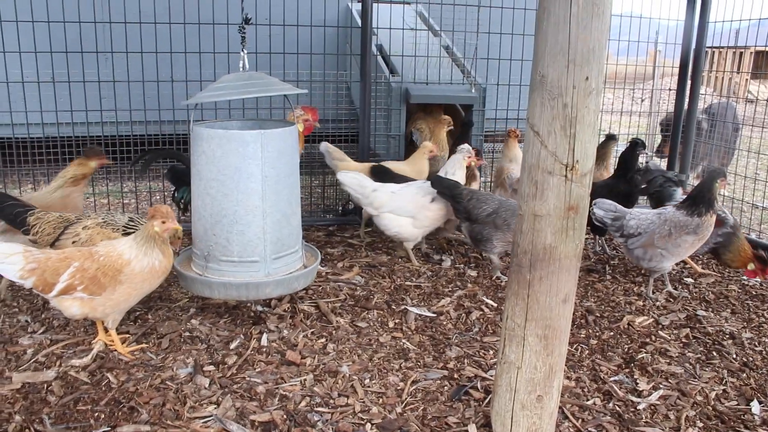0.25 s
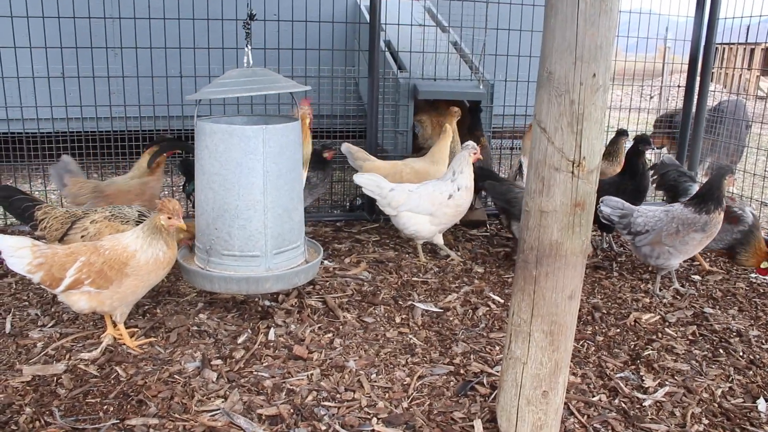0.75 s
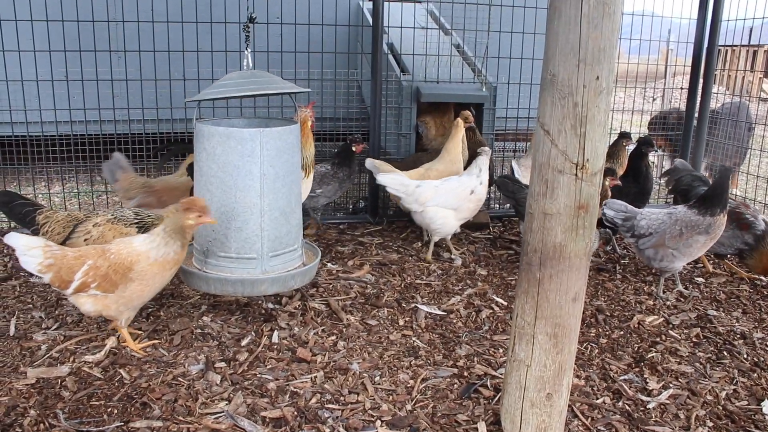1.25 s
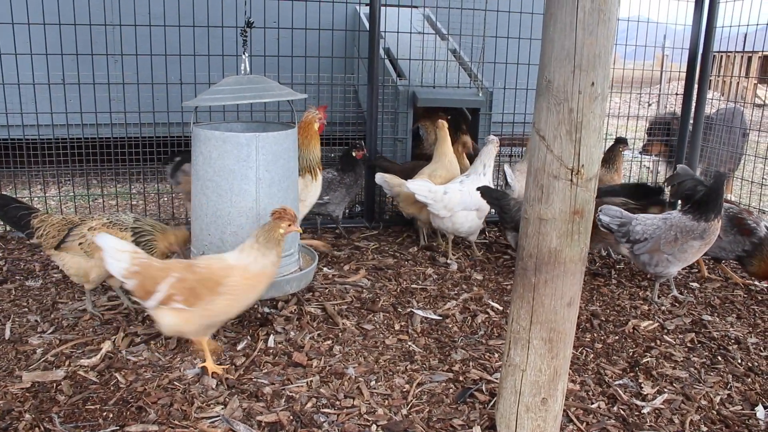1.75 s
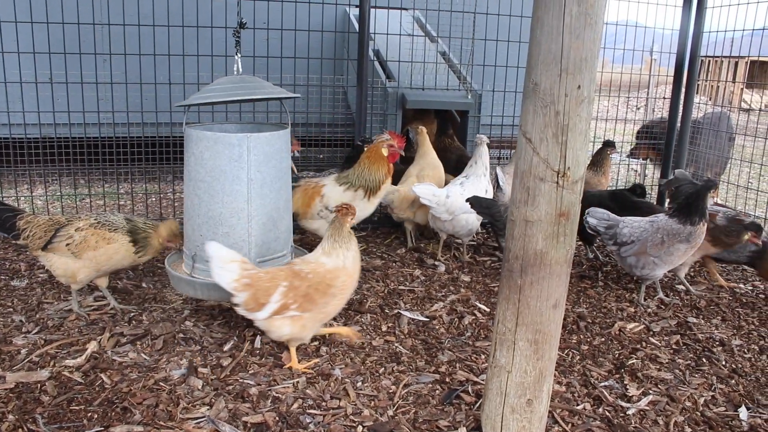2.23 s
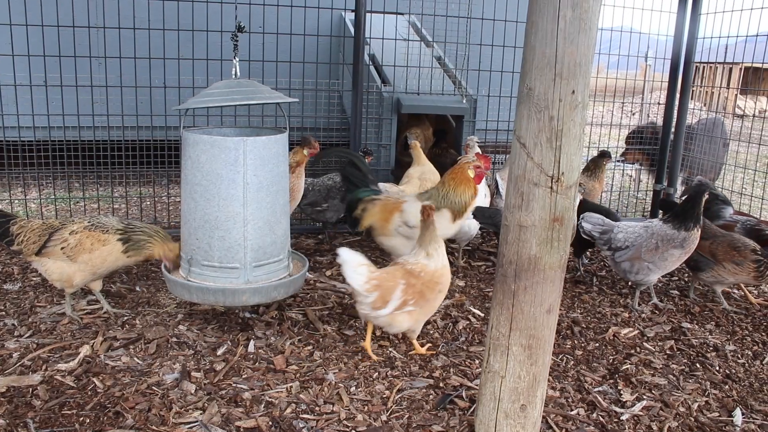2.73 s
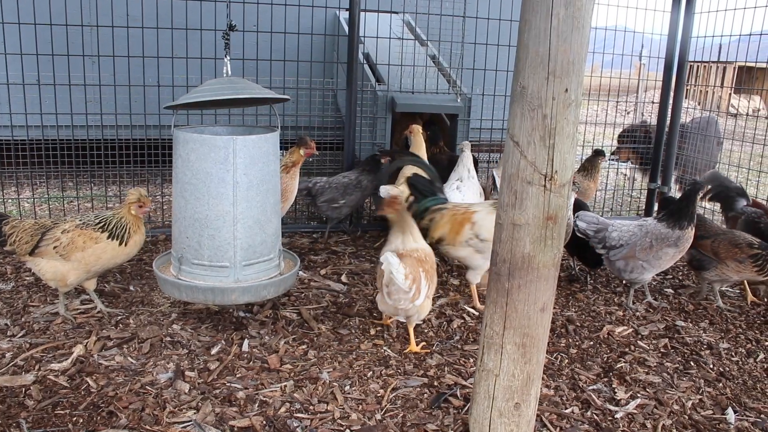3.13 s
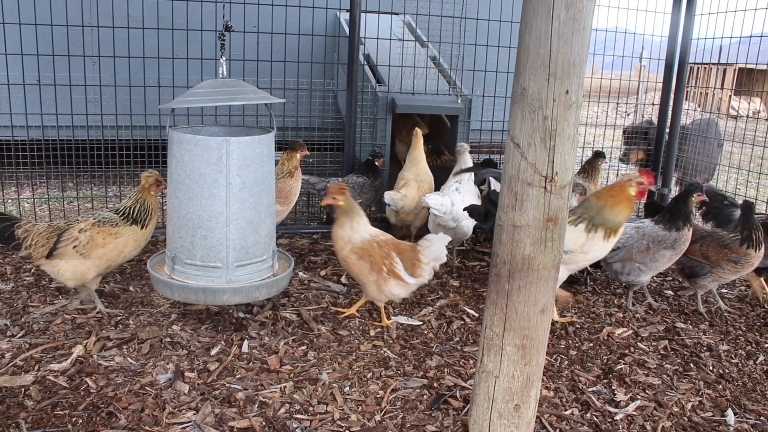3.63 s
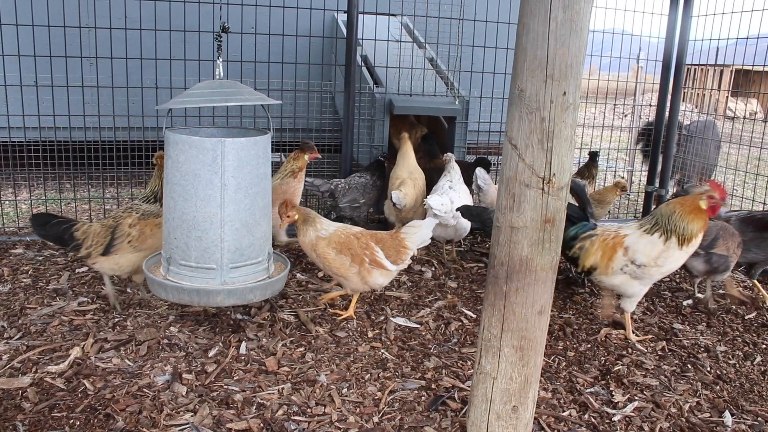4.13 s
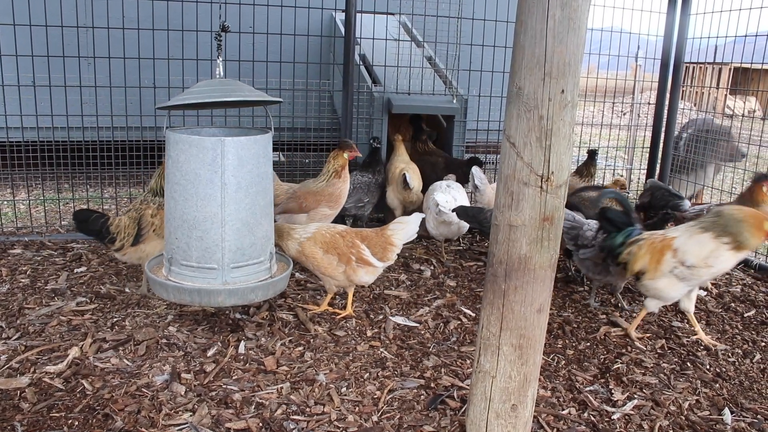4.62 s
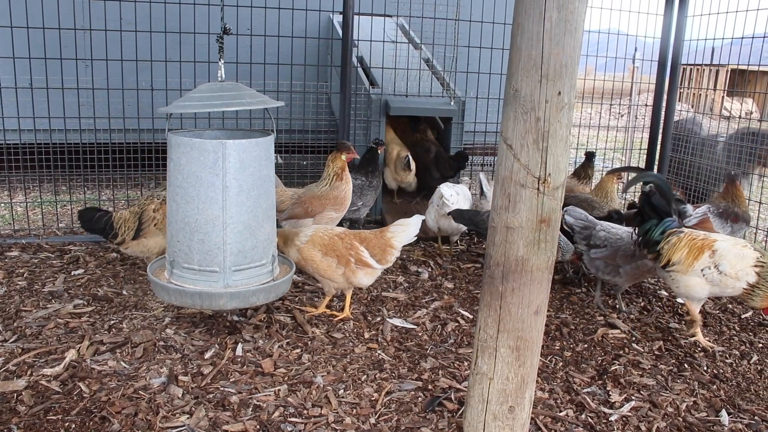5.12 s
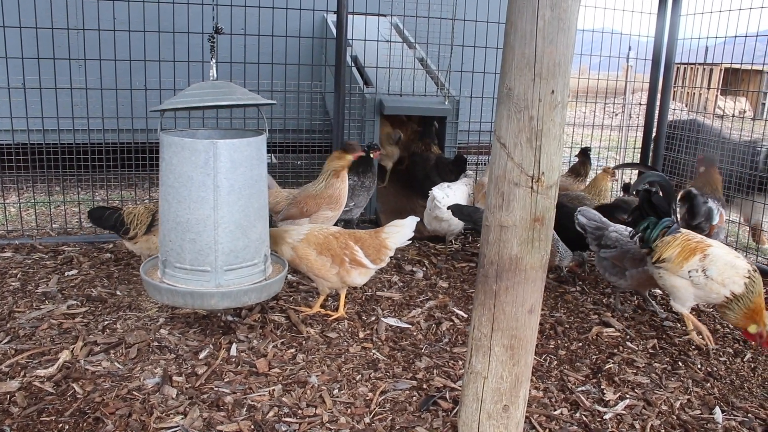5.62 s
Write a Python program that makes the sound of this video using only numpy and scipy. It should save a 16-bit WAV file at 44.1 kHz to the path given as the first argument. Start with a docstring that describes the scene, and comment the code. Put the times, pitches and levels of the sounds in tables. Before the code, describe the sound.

Loud, lumpy wind buffets the microphone as chickens cluck, chirp and whine, with small scuffs and snaps of wood chips underfoot.

```python
"""Wind rumbles and thumps on a microphone in an outdoor run while hens cluck, whine and chirp.
Calls are harmonic tones with half-pitch partials, thrown back by the coop wall and ground.
Feet, wings and beaks stir wood chips: band-passed grainy strokes and short snaps.
The wind is shaped noise with single thumps, over a patchy outdoor wash and recorder hiss."""
import sys
import numpy as np
from scipy import signal
from scipy.io import wavfile
from scipy.ndimage import uniform_filter1d, minimum_filter1d

SR = 44100
rng = np.random.default_rng(int(sys.argv[2]) if len(sys.argv) > 2 else 0)


def master_out(mix):
    """Clip the mix to full scale and print it as 16-bit PCM to the path in sys.argv[1]."""
    frames = np.transpose(np.atleast_2d(mix))
    ceiling = np.clip(frames, -1, 1)
    pcm = np.round(ceiling * 32767).astype(np.int16)
    wavfile.write(sys.argv[1], SR, pcm)


N = 258867


def gain_of(db):
    """Decibels to amplitude."""
    return 10 ** (np.asarray(db) / 20)


def evened(x):
    """Scales to rms 1."""
    return x / np.sqrt(np.mean(x ** 2) + 1e-20)


def read(points, hz):
    """Reads a spectrum on a log-frequency axis."""
    f, value = np.transpose(points)
    return np.interp(np.log(hz + 1), np.log(f + 1), value)


def add(mix, s, sound):
    """Mixes a sound in at time s."""
    part = mix[round(s * SR):][:len(sound)]
    part += sound[:len(part)]


def smooth_twice(x, size):
    """Two moving averages in a row: a gentle low-pass."""
    return uniform_filter1d(uniform_filter1d(x, size), size)


def wander(size, per_s):
    """Smooth random curve of about rms 1 that changes about per_s times a second."""
    span = max(int(SR / per_s), 1)
    return smooth_twice(rng.standard_normal(size), span) * np.sqrt(1.5 * span)


def grid(size):
    """Bin frequencies and frame times of the short-time spectra."""
    hop = size / 4
    return np.fft.rfftfreq(size, 1 / SR), np.arange(4 * N // size + 5) * hop / SR


def noise(db, size):
    """Noise whose short-time spectra follow db, an array of bins x frames."""
    real, imag = rng.standard_normal(db.shape[::-1] + (2,)).T
    spectra = (real + 1j * imag) * gain_of(db)
    return signal.istft(spectra, nperseg=size, noverlap=size * 3 // 4)[1][:N]


def band(x, lo_hz, hi_hz):
    """Steep band-pass."""
    sos = signal.butter(3, [lo_hz, min(hi_hz, SR / 2.5)], "band", fs=SR, output="sos")
    return signal.sosfilt(sos, x)


def hens():
    """All calls, high-passed by the small throat, with echoes off the coop wall and ground."""
    # clucks: start_s, length_s, peak_at_share, pitch_at_peak_hz, pitch_sag_share, level_at_peak_db,
    # half_pitch_partials_db, overtones_db (both against the pitch)
    cluck_rows = [(0.245, 0.043, 0.42, 1105, 0.17, -29, -29, -25),
                  (0.346, 0.037, .35, 1111, 0.011, -35.5, -20, -28),
                  (.458, 0.032, 0.36, 990, 0.03, -31, -26, -17),
                  (0.616, 0.047, 0.32, 1123, 0.018, -38, -15, -22),
                  (0.676, 0.035, 0.41, 900, .04, -35, -12, -26),
                  (0.854, 0.044, 0.31, 1029, 0.18, -27.5, -21, -32),
                  (1.013, 0.055, 0.58, 612, 0.16, -28.5, 6, -12),
                  (1.287, 0.041, .45, 1041, 0.012, -29.5, -19, -18),
                  (1.793, 0.049, 0.29, 1031, 0.14, -27, -1.5, -26),
                  (1.983, 0.02, .45, 666, 0.0019, -38.5, -1, -17),
                  (2.225, 0.054, .4, 919, 0.061, -38, -6, -21),
                  (2.329, 0.035, 0.66, 643, 0.17, -35.5, -2, -20),
                  (2.568, 0.032, 0.58, 1083, -0.021, -30.5, 0.5, -16),
                  (2.843, 0.039, 0.17, 921, -0.026, -26, -6.5, -17),
                  (3.676, .052, .35, 973, 0.096, -24, -6, -35),
                  (3.879, 0.042, .35, 1046, -0.07, -32.5, 3.5, -21),
                  (4.271, 0.04, 0.44, 960, 0.064, -20, -13.5, -27),
                  (4.474, 0.043, 0.2, 972, -0.05, -16.5, -16, -24.5),
                  (4.53, 0.013, 0.47, 720, 0.027, -29, 7, -18), (5.503, 0.018, .4, 716, .01, -39, 10, -10),
                  (5.567, 0.014, 0.39, 676, .06, -36.5, 4, -12)]
    # long whines, one list a call: time_s, pitch_hz, level_db
    whine_calls = [
        [(2.44, 882, -47), (2.456, 887, -28.5), (2.474, 892, -32.5), (2.496, 818, -33.5), (2.582, 837, -30),
         (2.61, 792, -31.5), (2.625, 768.9, -44)],
        [(2.563, 1100, -47), (2.569, 1096, -32), (2.585, 1051, -31), (2.609, 1051, -32.5), (2.627, 996, -35),
         (2.717, 1059, -28), (2.723, 1003, -33), (2.787, 1020, -33), (2.825, 984, -45.5), (2.855, 944, -35),
         (2.865, 1046, -30), (2.887, 1033, -53), (2.899, 1072, -28), (2.935, 980, -43), (2.951, 1014, -32),
         (2.973, 1016, -42), (2.983, 973, -51), (3.015, 968, -35), (3.035, 979, -51)],
        [(3.776, 966, -31), (3.796, 968, -17.5), (3.82, 956, -35.5), (3.832, 966.2, -24), (3.918, 954, -24),
         (3.93, 1048, -28), (3.948, 1052, -26.5), (4.012, 1093, -40), (4.032, 1164, -40), (4.058, 1098, -30),
         (4.082, 1112, -33), (4.098, 1165, -28.5), (4.122, 1155, -25), (4.15, 1164, -53)],
        [(4.328, 900, -54), (4.338, 892, -41), (4.364, 717, -39), (4.386, 700, -35), (4.4, 693, -54)],
    ]
    # one value a whine: overtones_db against the pitch at whine_full_db
    whine_over_db = [-32, -26.5, -43, -29]
    # falling chirps: start_s, length_s, start_hz, end_hz, level_at_peak_db, peak_at_share, overtones_db
    chirp_rows = [(1.065, 0.048, 1650, 790, -23.5, 0.65, -19), (3.013, 0.029, 960, 730, -39, 0.53, -22),
                  (4.41, 0.062, 1900, 1108, -28.5, 0.69, -13.5), (4.682, .057, 1776, 1060, -30, 0.64, -18)]
    # coop wall and ground: delay_s, level_db
    echoes = [(.006, -15), (.011, -23), (.019, -19.5), (.027, -26.5), (.038, -25.5)]
    whine_full_db, whine_half_db, throat_hz = -29, -29, 400

    voices = np.zeros(N)
    for row in cluck_rows:
        add(voices, *call(cluck(*row), rough=.014, flutter_db=1.4, breath_db=-9))
    for points, over_db in zip(whine_calls, whine_over_db):
        # the overtones hold their own level while the pitch swells and dips
        rows = [(s, hz, db, whine_half_db, over_db + whine_full_db - db) for s, hz, db in points]
        add(voices, *call(rows, rough=.008, flutter_db=2.2, breath_db=-16))
    for row in chirp_rows:
        add(voices, *call(chirp(*row), rough=.014, flutter_db=1.4, breath_db=-12))

    # the small throat hardly radiates below throat_hz
    voices = signal.sosfilt(signal.butter(3, throat_hz, "high", fs=SR, output="sos"), voices)
    out = voices.copy()
    for s, db in echoes:
        blur = 1 + 0.61 * wander(N, 340)  # rough surfaces
        add(out, s, gain_of(db) * voices * blur)
    return out


def cluck(start, length, top, hz, sag, db, half_db, over_db):
    """Quick rise, slow then faster fade; the pitch glides and the half-pitch partials grow."""
    hold_share, half_growth_db = 0.22, 7
    u = np.array([0, top, min(top + hold_share, .9), 1])
    level_db = db + np.array([-14, 0, -3, -18])
    pitch_hz = hz * (1 + sag * (top - u))
    half_db = half_db + half_growth_db * (u - top)
    return np.transpose([start + length * u, pitch_hz, level_db, half_db, over_db + 0 * u])


def chirp(start, length, from_hz, to_hz, db, top, over_db):
    """The pitch drops and settles while the level swells and the overtones dull."""
    steepness, lead_share = 7.14, .22  # the middle of the drop leads the peak
    start_db, end_db, half_db, dulling_db = -39, -13, -17, 16
    u = np.linspace(0, 1, 16)
    fall = 1 / (1 + np.exp(steepness * (u - top + lead_share)))
    pitch_hz = to_hz + (from_hz - to_hz) * fall
    level_db = db + np.interp(u, [0, top, 1], [start_db, 0, end_db])
    over_db = over_db + dulling_db * (top - u)
    return np.transpose([start + length * u, pitch_hz, level_db, half_db + 0 * u, over_db])


def call(rows, rough, flutter_db, breath_db):
    """A syrinx tone: every second beat differs a little, which adds partials at half steps of the pitch."""
    s, *columns = np.transpose(rows)
    t = np.arange(s[0], s[-1], 1 / SR)
    hz, level_db, half_db, over_db = (np.interp(t, s, c) for c in columns)
    turns = np.cumsum(hz * (1 + rough * wander(len(t), 180))) / SR + rng.random()
    tone = np.sin(2 * np.pi * turns)
    for k in range(4):
        tone += gain_of(half_db - 17.1 * abs(k - .4)) * np.sin(2 * np.pi * (k + .5) * turns)
        tone += gain_of(over_db - 9.5 * k) * np.sin(2 * np.pi * (k + 2) * turns)
    tone *= 1 + gain_of(breath_db) * wander(len(t), 650)  # turbulent air smears each partial
    edge = np.clip(np.minimum(t - s[0], s[-1] - t) / 0.0088, 0, 1)  # fades in and out
    level = gain_of(level_db + flutter_db * wander(len(t), 48))
    return s[0], np.sqrt(2) * tone * edge * level


def scuffs():
    """Feet and wings stir the chips: noise chopped into grains, with a quick start and a slower end."""
    # strokes: start_s, length_s, level_db (rms before the envelope), low_edge_hz, high_edge_hz
    strokes = [(0.438, .015, -40, 400, 900), (0.723, 0.013, -29, 585, 1470), (.736, 0.061, -42, 800, 4450),
               (0.743, 0.071, -28, 400, 1140), (.765, .022, -30.5, 376, 1190),
               (.811, 0.023, -33.5, 400, 3750), (0.827, 0.022, -27.5, 400, 1290),
               (1.221, 0.024, -36.5, 700, 1790), (1.953, .06, -54.5, 5000, 14000),
               (2.197, .02, -43, 1500, 3420), (2.332, 0.021, -33, 398, 1290),
               (2.465, 0.024, -55, 7000, 15000), (2.848, 0.016, -37, 500, 3200),
               (3.082, 0.094, -50, 2980, 11900), (3.24, 0.1, -36.5, 700, 5000),
               (3.293, .016, -31, 2000, 5070), (3.307, 0.044, -27.5, 685, 3540),
               (3.329, .023, -32, 596, 7000), (3.36, 0.022, -34, 1980, 15000),
               (3.37, 0.037, -41, 5900, 15000), (3.372, 0.07, -43, 1220, 3900),
               (3.387, 0.015, -26.5, 470, 1140), (3.809, 0.033, -35, 444, 1450),
               (3.885, 0.086, -40, 450, 4470), (3.94, .088, -57, 5000, 13000),
               (4.103, 0.018, -40, 500, 1800), (5.017, .034, -37, 450, 1200)]
    out = np.zeros(N)
    for s, length, db, lo_hz, hi_hz in strokes:
        t = np.arange(0, 3 * length, 1 / SR)
        grains = rng.standard_normal(len(t)) * gain_of(3.5 * wander(len(t), 350))
        dull = signal.lfilter([1], [1, -.8], grains)  # soft chips favour the low end of the band
        shape = np.clip(t / (0.3 * length), 0, 1) * np.exp(-(t / length) ** 0.84)
        add(out, s, gain_of(db) * evened(band(dull, lo_hz, hi_hz)) * shape)
    return out


def ticks():
    """Chips snap under claws and beaks: a click and a short crackle in the band of each chip."""
    # snaps: start_s, peak_db, low_edge_hz, high_edge_hz, t60_s
    snaps = [(1.6096, -41.5, 6500, 11500, .02), (1.73, -41, 5000, 10000, .01),
             (1.9505, -39, 5000, 15000, 0.011), (2.081, -47, 6000, 10000, .01),
             (2.479, -41, 5000, 15000, .008), (2.514, -30.5, 3500, 15500, 0.0095),
             (2.5388, -28.5, 2500, 5600, 0.02), (2.544, -37, 3500, 5800, 0.074),
             (2.6045, -41, 4500, 12000, .01), (2.698, -33, 3000, 13000, 0.018),
             (2.961, -36.5, 2630, 3600, 0.039), (3.154, -34.5, 1502, 4930, 0.031),
             (3.8875, -43, 4000, 9000, .02), (3.913, -39, 2500, 6000, 0.018),
             (3.966, -42, 3500, 11500, .02), (4.001, -30, 2500, 12800, 0.022),
             (4.041, -52, 4450, 11000, .008), (4.203, -52, 2500, 4500, .02),
             (4.2387, -33, 2700, 3650, 0.038), (5.094, -32, 2505, 5400, 0.012),
             (5.4459, -26.5, 3000, 7900, 0.007)]
    out, t = np.zeros(N), np.arange(3000) / SR
    for s, db, lo_hz, hi_hz, t60 in snaps:
        click_and_crackle = (t == 0) + 0.22 * rng.standard_normal(len(t))
        snap = band(click_and_crackle * gain_of(-60 * t / t60), lo_hz, hi_hz)
        add(out, s, gain_of(db) * snap / abs(snap).max())
    return out


def wind():
    """Eddies on the microphone: lumpy low noise that reaches higher in hard gusts, and single thumps."""
    # gust course: time_s, nominal_rumble_db, upper_rumble_db (against the low rumble)
    gust_points = [(0.0, -32.5, -6), (0.08, -27, -24), (0.16, -21, -5), (0.23, -28, -13),
                   (0.41, -27, -12.5), (0.6, -39, -6), (0.75, -16.5, -8.5), (0.95, -27, -8),
                   (1.04, -15.5, -13.5), (1.14, -17.5, -4.5), (1.19, -11.5, -9.5), (1.54, -16, -1.5),
                   (1.68, -18.5, -16.5), (1.73, -23, -1), (1.78, -17.5, -5.5), (1.86, -26.5, -2.5),
                   (1.93, -13, -6), (1.98, -25, -2), (2.03, -19.5, -11.5), (2.45, -38, -7.5),
                   (2.68, -23.5, -21), (2.71, -29, -7), (2.89, -30.5, -16), (3.06, -41.5, -7),
                   (3.27, -12.5, -5), (3.3, -19.5, -6), (3.92, -16, -7), (3.97, -20.5, -11.5),
                   (4.13, -15, -3.5), (4.41, -27.5, -13), (4.58, -32.5, -1), (4.84, -26.5, -9.5),
                   (5.0, -24.5, -4), (5.1, -17, -11), (5.13, -29, -2), (5.18, -7, -0.5), (5.26, -19, -7),
                   (5.36, -12.5, -4.5), (5.49, -23, -4), (5.54, -17.5, -12), (5.75, -21, -2),
                   (5.77, -14.5, -4), (5.85, -23.5, -14), (5.87, -23.5, -1.5)]
    # spectrum in a hard gust: frequency_hz, level_db_per_hz (relative)
    hard_gust_spectrum = [(8, -6), (25, 0.5), (70, -1), (150, -6.5), (220, -15), (300, -25), (430, -34),
                          (700, -39.5), (1500, -70), (4000, -100)]
    # how far each band follows the upper rumble: frequency_hz, share
    brightening = [(60, 0.0091), (160, 1.73), (400, 0.71)]
    # single eddies that thump the port: start_s, level_db
    thumps = [(.726, -20), (1.346, -7.5), (1.356, -8.5), (1.604, -21), (1.741, -17.5), (1.932, -17.5),
              (2.091, -22.5), (3.196, -28), (3.24, -19), (3.253, -19), (3.564, -20), (3.744, -12.5),
              (3.77, -12.5), (3.865, -14.5), (3.916, -13), (4.062, -21), (4.073, -12.5), (4.129, -16.5),
              (4.196, -21), (5.166, -8.5), (5.19, -7), (5.308, -19), (5.375, -15), (5.584, -14.5)]
    hard_gust_upper_db, swell_db, swells_per_s = -5, 1.25, 18

    hz, t = grid(size=2048)
    s, rumble_db, upper_db = np.transpose(gust_points)
    upper_change_db = np.interp(t, s, upper_db) - hard_gust_upper_db
    shape_db = read(hard_gust_spectrum, hz)[:, None] + np.outer(read(brightening, hz), upper_change_db)
    low_power = (gain_of(shape_db[hz < 110]) ** 2).sum(0)
    eddies = evened(noise(shape_db - 10 * np.log10(low_power), size=2048))
    # level partly evened out: the gusts set the slow course
    eddies = eddies / (uniform_filter1d(eddies ** 2, size=3000) + 0.046) ** 0.37

    # small eddies pass the port one by one, and lump the upper rumble most
    low = smooth_twice(eddies, 130)
    lumps = wander(N, 43.7)
    lumpy = low * gain_of(1.65 * lumps) + (eddies - low) * gain_of(5.2 * lumps - 2.0)
    course_db = np.interp(np.arange(N) / SR, s, rumble_db) + 1.5
    out = lumpy * gain_of(course_db + swell_db * wander(N, swells_per_s))

    thump_hz = 230 * gain_of(2.04 * rng.standard_normal(len(thumps)))
    for (s, db), hz in zip(thumps, thump_hz):
        u = np.arange(0, 3, hz / SR)  # time in cycles
        add(out, s, gain_of(db) * np.sin(2 * np.pi * u) * np.exp(-((u - .8) / 0.62) ** 2))
    return out


def wash():
    """Far wind in the yard and the shuffle of the flock: patchy noise that flickers slightly."""
    # spectrum: frequency_hz, level_db_per_hz (relative)
    wash_spectrum = [(60, -30), (140, -10), (250, 2), (600, -2), (1050, 0), (1600, -7.5), (2300, -6),
                     (3500, -12), (5500, -21.5), (9000, -36), (16000, -30.5)]
    level_db = -44.5
    hz, t = grid(size=512)
    patches = rng.standard_normal((len(t), len(hz))).T
    patches = evened(uniform_filter1d(uniform_filter1d(patches, size=6, axis=0), size=14, axis=1))
    flicker = rng.exponential(1, len(t))  # small steps that lift all bands at once
    db = read(wash_spectrum, hz)[:, None] + 1.05 * patches + 0.89 * flicker
    return gain_of(level_db) * evened(noise(db, size=512))


def hiss():
    """Recorder hiss: steady shaped noise, partly shared by the channels."""
    # spectrum: frequency_hz, level_db_per_hz (relative)
    hiss_spectrum = [(1500, -53), (4000, -1), (8000, 5.5), (16000, 3.5)]
    own_level_db = -60.5  # of each channel's own part
    hz, t = grid(size=512)
    db = read(hiss_spectrum, hz)[:, None] + 0 * t
    shared, left, right = (evened(noise(db, size=512)) for _ in range(3))
    return gain_of(own_level_db) * (np.array([left, right]) + 0.54 * shared)


def scene():
    """All sources central but for the hiss; the deepest rumble is slightly stronger on the left."""
    gusts = wind()
    lean = 0.011 * uniform_filter1d(gusts, size=140)
    return gusts + [lean, -lean] + hens() + scuffs() + ticks() + wash() + hiss()


def record(dry):
    """A limiter ducks the hardest peaks in both channels; then the band limit of the recorder."""
    limit_db, limit_share, recovery_db_per_s = -6, 0.52, 146  # the share is taken off the overshoot
    edge_hz = 15740
    fall_db = np.arange(N) * recovery_db_per_s / SR
    peak_db = -minimum_filter1d(-20 * np.log10(abs(dry).max(0) + 1e-9), size=201)
    held_db = np.maximum.accumulate(peak_db + fall_db) - fall_db  # instant rise, steady recovery
    over_db = np.maximum(held_db - limit_db, 0)
    ducked = dry / gain_of(limit_share * uniform_filter1d(over_db, size=201))
    low_pass = signal.firwin(2047, edge_hz, window=("kaiser", 10), fs=SR)
    return signal.oaconvolve(ducked, low_pass[None], "same")


dry = scene()
out = record(dry)
master_out(out)
```